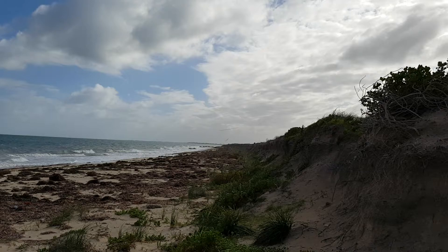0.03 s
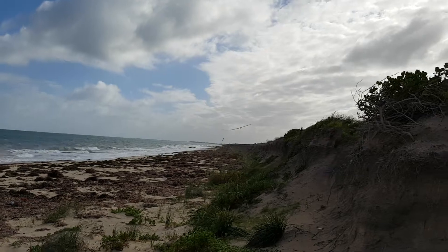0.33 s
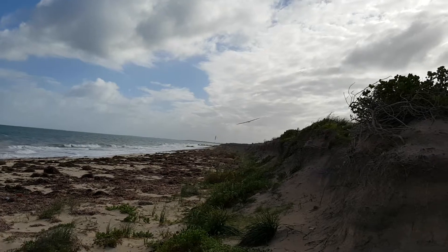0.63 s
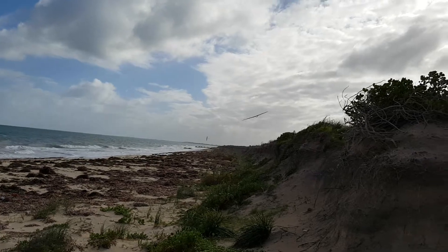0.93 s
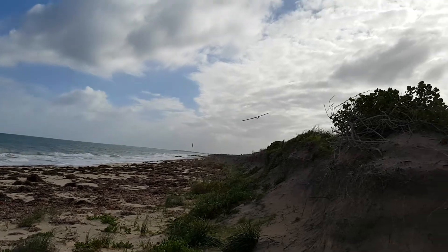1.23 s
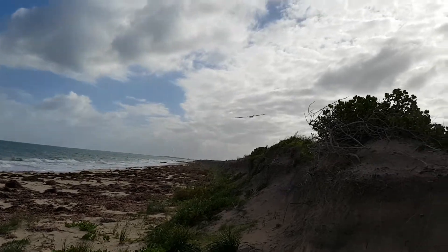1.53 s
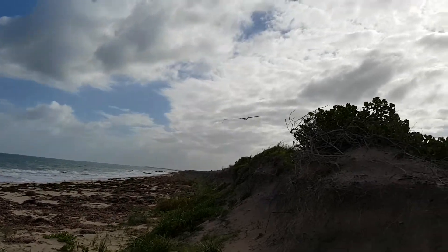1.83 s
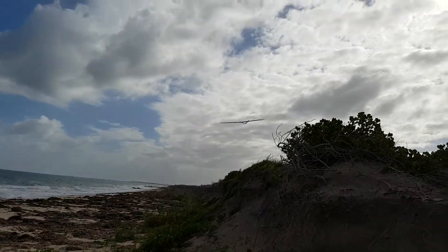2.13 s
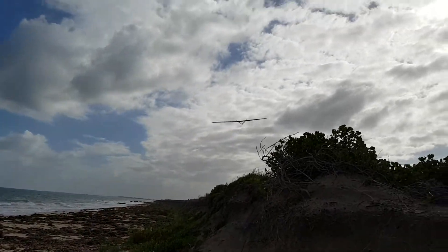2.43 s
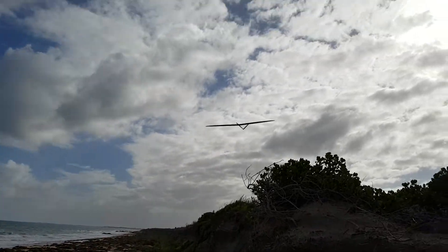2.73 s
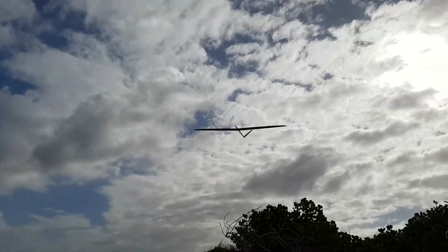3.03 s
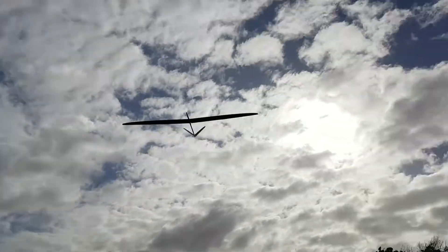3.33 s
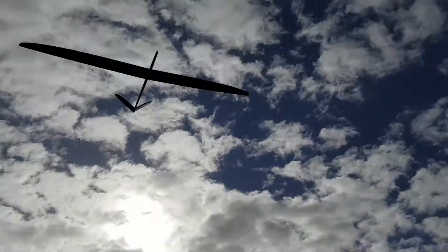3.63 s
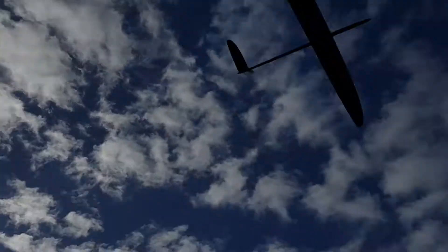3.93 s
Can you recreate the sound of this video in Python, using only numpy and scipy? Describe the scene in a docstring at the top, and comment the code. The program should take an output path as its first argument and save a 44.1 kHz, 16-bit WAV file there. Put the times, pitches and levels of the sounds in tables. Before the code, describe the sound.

Wind buffets the microphone from the start, with low rumbles, flaps and thumps, harder on the right. A soft, smooth hiss of surf lies behind it, a little clearer from about 1 second. From around 2.5 seconds the gusts strengthen, fluttering and crackling on the right. At about 3.8 seconds the surf fades and a rough rush of wind swells quickly on the right side.

```python
"""A windy beach. Gusts rumble, flap and thump at the two ports of a microphone, harder on the right,
over the hiss of surf. Each port has its own turbulence, which breaks the wind noise into bursts.
The wind freshens until it flutters and crackles on the right. Near the end the surf fades and a
rough rush of wind swells quickly and tears at the right port."""
import sys
import numpy as np
from scipy import signal
from scipy.fft import rfft, irfft
from scipy.io import wavfile
from scipy.ndimage import uniform_filter1d

SR = 44100
rng = np.random.default_rng(int(sys.argv[2]) if len(sys.argv) > 2 else 0)


def unload_wav(signal):
    """Save mono or channel-first audio to the path in sys.argv[1] as 16-bit WAV at rate SR, clipped to [-1, 1]."""
    wavfile.write(
        sys.argv[1],
        SR,
        np.round(np.clip(np.atleast_2d(signal).T, -1, 1) * 32767).astype(np.int16),
    )


N = 176400
T = np.arange(N) / SR

# Wind strength per port: t/s, level/dB
GUST_LEFT_DB = [(.12, -31), (.2, -34), (.55, -34), (.75, -37), (1.0, -32.5), (1.2, -27), (1.42, -30),
                (1.53, -24.5), (1.7, -29.5), (1.98, -31.5), (2.1, -28), (2.3, -27), (2.62, -17.5),
                (2.88, -27), (2.98, -20.5), (3.2, -21.5), (3.5, -21.5), (3.62, -16), (3.75, -10),
                (3.9, -20), (4.0, -18)]
GUST_RIGHT_DB = [(.12, -15.5), (.26, -22.5), (.34, -17.5), (.42, -28), (.49, -22), (.57, -27), (.75, -31.5),
                 (.83, -21.5), (.97, -29), (1.1, -19), (1.35, -25.5), (1.52, -22.5), (1.98, -28),
                 (2.12, -19), (2.17, -30.5), (2.29, -26.5), (2.45, -20), (2.72, -14.5), (2.87, -21.5),
                 (3.0, -13.5), (3.1, -17), (3.3, -13), (3.48, -14), (3.62, -12), (3.675, -18.5),
                 (3.72, -11.5), (3.8, -11), (3.97, -15.5)]
# Envelopes of surf, right-port flutter and crackle: t/s, level/dB
SURF_DB = [(.15, -42), (.58, -43), (.8, -40), (1.0, -35.5), (1.3, -34.5), (1.8, -33.5), (2.15, -32.5),
           (3.1, -34), (3.35, -36.5), (3.65, -35), (3.78, -43.5), (3.92, -48)]
FLUTTER_DB = [(.12, -34), (.3, -54), (.48, -40), (.6, -37.5), (.83, -34.5), (1.4, -31.5), (1.95, -43),
              (2.3, -35.5), (2.74, -27.5), (2.87, -30), (3.02, -23.5), (3.11, -28.5), (3.47, -23),
              (3.64, -23.5), (3.68, -34.5), (3.8, -27), (4.0, -47)]
CRACKLE_DB = [(.12, -71), (2.3, -65), (2.75, -45.5), (3.2, -42), (3.5, -38.5), (3.655, -39.5),
              (3.68, -44.5), (4.0, -48)]
# Lone eddies per port: t/s, level/dB, f/Hz
LONE_EDDIES_LEFT = [(.169, -22, 115), (.417, -7, 293), (.627, -10, 336), (1.091, -2, 436), (1.242, -9, 294),
                    (1.51, -4.5, 292), (1.556, -4.5, 400), (2.539, -3.5, 464), (2.646, -4.5, 496),
                    (2.96, -2.5, 362), (3.977, -15, 400)]
LONE_EDDIES_RIGHT = [(.114, -20, 210), (.143, -16, 386), (.177, -0.5, 730), (.249, -6.5, 464),
                     (.272, -9, 440), (.326, -10.5, 700), (.408, -7, 503), (.463, -7.5, 1020),
                     (.479, -5.5, 465), (.490, -8, 905), (.55, -12.5, 860), (.651, -8.5, 450),
                     (1.131, -20, 343), (1.166, -13, 111), (1.803, -6, 312), (2.13, -5.5, 427),
                     (2.456, -6, 1150), (3.592, -7, 1000)]
# Sharpest crackles: t/s, peak level/dB
SNAP_PEAKS = [(3.278, -23), (3.391, -22)]
# Noise spectra: f/Hz, relative level/dB
RUMBLE_SPECTRUM = [(12, -14), (25, -19), (45, -7), (75, -1), (130, 0), (220, -5.5), (450, -25.5),
                   (1500, -62.5)]
BUFFET_SPECTRUM = [(40, -27.5), (120, -5.5), (220, -1.5), (360, 1), (520, -2.5), (750, -10), (1100, -20),
                   (2000, -37.5), (5000, -78), (16000, -77)]
FLUTTER_SPECTRUM = [(200, -26), (600, 1), (1000, 1.5), (1800, -1), (2800, -9.5), (4000, -21.5),
                    (6000, -30.5), (16000, -71)]
SURF_LEFT_SPECTRUM = [(100, 1.5), (500, 8), (1150, -4), (2000, 2), (2600, -2), (3400, -6.5), (4300, -14.5),
                      (5200, -15), (7000, -20), (9000, -17), (12500, -23.5), (15500, -28.5)]
SURF_RIGHT_SPECTRUM = [(100, 2), (500, -3.5), (1200, -6.5), (2000, -1.5), (2800, -4.5), (4400, -8),
                       (5500, -18), (6600, -14.5), (7700, -24.5), (8800, -16), (10000, -27), (11600, -19),
                       (12900, -35), (14300, -24), (15500, -50)]
CRACKLE_SPECTRUM = [(500, -61), (2500, 10), (5000, -4), (8500, -4.5), (11500, -15), (13000, -22),
                    (16000, -23)]
SWOOSH_SPECTRUM = [(150, -12), (500, 0), (1000, 3), (1500, -1), (2200, -3.5), (3000, -12), (4200, -22.5),
                   (5800, -42), (16000, -63)]

GUST_REF_DB, EDDY_BAND_HZ = -22, (7, 119)


def amp(db):
    """Decibels to gain."""
    return 10 ** (np.asarray(db) / 20)


def unit_rms(x):
    """Scale to rms 1."""
    return x / np.sqrt(np.mean(x ** 2) + 1e-20)


def curve(points):
    """Linear envelope through (t/s, value) points."""
    return np.interp(T, *np.transpose(points))


def colour(x, spectrum, size=4096):
    """Causal filter with the given spectrum; output rms 1."""
    hz, db = np.transpose(spectrum)
    bins_hz = abs(np.fft.fftfreq(size, 1 / SR)) + 1
    log_gain = np.log(amp(np.interp(np.log(bins_hz), np.log(hz), db)))
    taps = np.fft.ifft(np.exp(signal.hilbert(log_gain).conj())).real[:size // 2]
    return unit_rms(signal.oaconvolve(x, taps)[:N])


def wander(slow_hz, fast_hz, limit_sigma=3.35):
    """Random motion between two rates, soft-limited."""
    hz = np.fft.rfftfreq(N, 1 / SR)
    shape = hz / (hz + slow_hz) ** 1.5 / np.sqrt(1 + (hz / fast_hz) ** 4)
    motion = unit_rms(irfft(rfft(rng.standard_normal(N)) * shape, N))
    return limit_sigma * np.tanh(motion / limit_sigma)


def turbulent(swing_db):
    """Noise in bursts, with steady long-term power."""
    bursts = amp(swing_db) * rng.standard_normal(N)
    return bursts / np.sqrt(uniform_filter1d(amp(2 * swing_db), 6000))


def rumble(gust_db, base_db):
    """Large slow eddies press on a port; grows more slowly than the gust."""
    air = colour(turbulent(1.8 * wander(slow_hz=2, fast_hz=30)), RUMBLE_SPECTRUM)
    first_gust_db = 11 / (1 + (T / 0.24) ** 6)
    return air * amp(base_db + first_gust_db + 0.52 * (gust_db - GUST_REF_DB))


def buffet(gust_db, eddies, fast_from_db=-15.5, fast_span_db=8):
    """Air flaps hollowly in a port; strong gusts are steadier and flap higher."""
    depth_db = np.maximum(5 - 0.14 * (gust_db - GUST_REF_DB), 0)
    air = turbulent(depth_db * eddies)
    low = colour(air, BUFFET_SPECTRUM)
    high = colour(air, [(1.41 * hz, db) for hz, db in BUFFET_SPECTRUM])
    high_share = np.clip((gust_db - fast_from_db) / fast_span_db, 0, 1)
    return ((1 - high_share) * low + high_share * high) * amp(gust_db)


def flutter(level_db, gust_db, eddies):
    """The sharpest eddies tear brightly: separate flaps in light air, a rush in strong."""
    depth_db = np.clip(6.5 - 0.33 * (gust_db - GUST_REF_DB), 2, 10)
    sharp_eddies = unit_rms(eddies + 0.5 * wander(*EDDY_BAND_HZ))
    return colour(turbulent(depth_db * sharp_eddies), FLUTTER_SPECTRUM) * amp(level_db)


def surf(spectrum):
    """Waves break along the beach in a smooth hiss."""
    ripple_db = 0.8 * wander(slow_hz=3.2, fast_hz=30)
    return colour(turbulent(ripple_db), spectrum) * amp(curve(SURF_DB))


def thumps(lone_eddies, rough_hz, push_hz=90, width_cycles=0.48, trim_db=-1, size=2048):
    """Each lone eddy: a brief ragged pressure swing over a low push."""
    out = np.zeros(N + size)
    t = (np.arange(size) - size // 2) / SR
    lowpass = signal.butter(3, rough_hz, fs=SR)
    push = 0.22 * np.sin(2 * np.pi * push_hz * t) * np.exp(-2 * (push_hz * t) ** 2)
    for centre_s, db, hz in lone_eddies:
        roughness = unit_rms(signal.lfilter(*lowpass, rng.standard_normal(size)))
        swing = np.cos(2 * np.pi * (hz * t + rng.random())) + 0.32 * roughness
        start = round(centre_s * SR) - size // 2
        out[start:start + size] += amp(db + trim_db) * (swing / np.cosh(t * hz / width_cycles) + push)
    return out[:N]


def crackle(eddies, ticks_per_s=450, spread_db=5.5, tick_swing_db=3.5, rustle_swing_db=3.6):
    """Fast air ticks and rustles at the port rim, clumped by the eddies."""
    sizes = amp(spread_db * np.minimum(rng.exponential(1, N), 3) + tick_swing_db * eddies)
    ticks = sizes * rng.choice([-1, 1], N) * (rng.random(N) < ticks_per_s / SR)
    rustle = 0.7 * turbulent(rustle_swing_db * eddies)
    return colour(unit_rms(ticks) + rustle, CRACKLE_SPECTRUM) * amp(curve(CRACKLE_DB))


def snaps(decay_s=0.00017, size=128):
    """Single crackles stand out as bright ticks."""
    out = np.zeros(N)
    for start_s, db in SNAP_PEAKS:
        tick = rng.standard_normal(size) * np.exp(-T[:size] / decay_s)
        out[round(start_s * SR):][:size] = amp(db) * tick / abs(tick).max()
    return out


def wind_swoosh(start_s=3.825, rise_s=0.039, hold_db=-14.5, fall_from_s=3.955, fall_db_per_s=68):
    """A rough rush of wind swells quickly and tears at the right port."""
    opening = np.clip((T - start_s) / rise_s, 0, 1)
    level_db = hold_db - fall_db_per_s * np.maximum(T - fall_from_s, 0)
    air = turbulent(4.7 * wander(slow_hz=40, fast_hz=248))
    return colour(air, SWOOSH_SPECTRUM) * opening * amp(level_db)


def scene():
    """Independent wind and surf noise per port; crackle and swoosh on the right only."""
    gust_db, eddies = curve(GUST_LEFT_DB), wander(*EDDY_BAND_HZ)
    left = rumble(gust_db, base_db=-28.5) + amp(-1) * buffet(gust_db, eddies)
    left += thumps(LONE_EDDIES_LEFT, rough_hz=810)
    left += flutter(-56 + 0.72 * (gust_db - GUST_REF_DB), gust_db, eddies)
    left += surf(SURF_LEFT_SPECTRUM)

    gust_db, eddies = curve(GUST_RIGHT_DB), wander(*EDDY_BAND_HZ)
    right = rumble(gust_db, base_db=-27) + amp(1.5) * buffet(gust_db, eddies)
    right += thumps(LONE_EDDIES_RIGHT, rough_hz=1300)
    right += flutter(curve(FLUTTER_DB), gust_db, eddies)
    right += crackle(eddies) + snaps() + wind_swoosh()
    right += amp(-3.5) * surf(SURF_RIGHT_SPECTRUM)
    return np.array([left, right])


def record(dry):
    """Microphone: opens, soft-clips, limits the band."""
    open_s, fade_s, cutoff_hz = 0.105, 0.0032, 15850
    opened = dry * np.clip((T - open_s) / fade_s, 0, 1)
    clipped = opened / (1 + opened ** 6) ** (1 / 6)
    lowpass = signal.firwin(511, cutoff_hz, window=("kaiser", 9), fs=SR)
    return signal.oaconvolve(clipped, lowpass[None], "same")


dry = scene()
out = record(dry)
unload_wav(out)
```